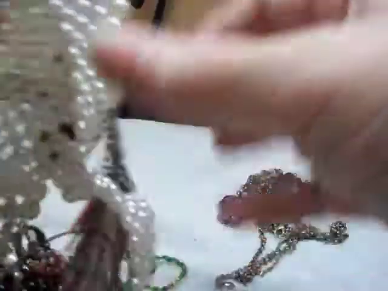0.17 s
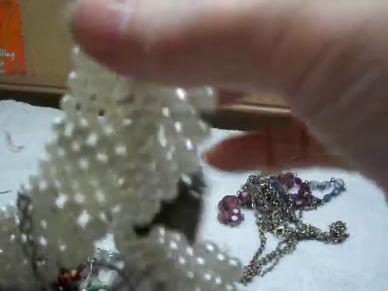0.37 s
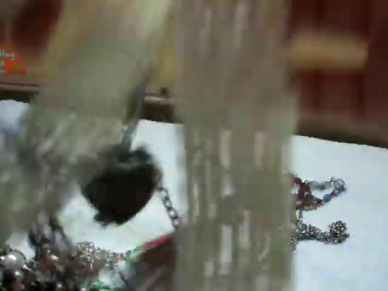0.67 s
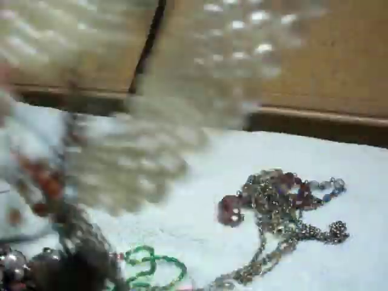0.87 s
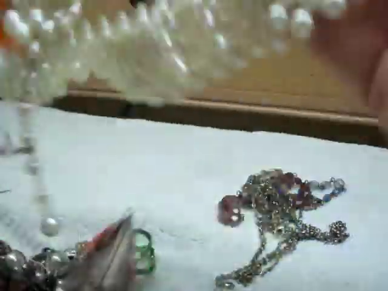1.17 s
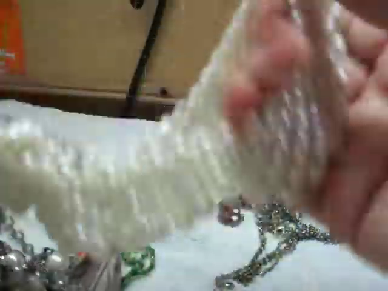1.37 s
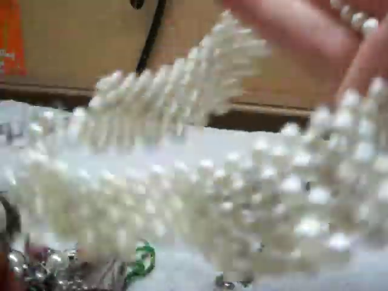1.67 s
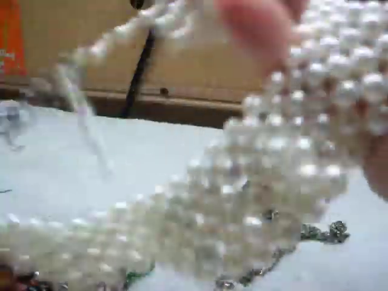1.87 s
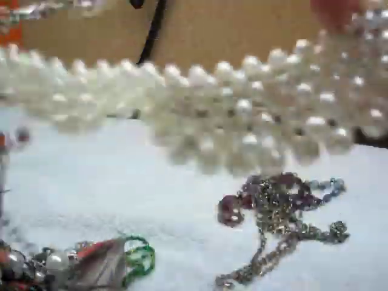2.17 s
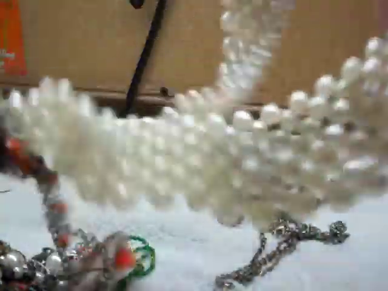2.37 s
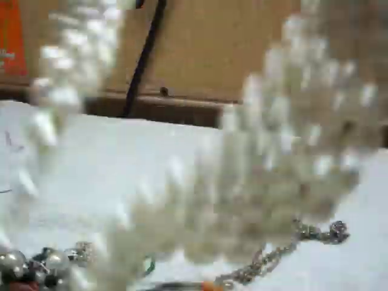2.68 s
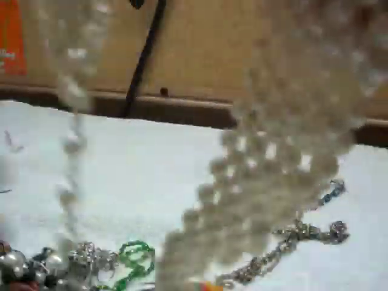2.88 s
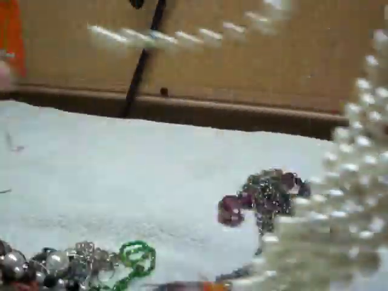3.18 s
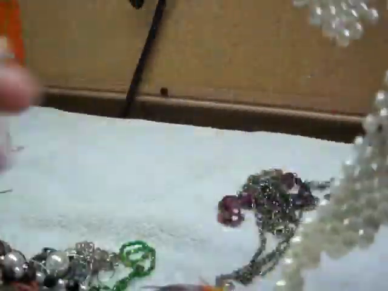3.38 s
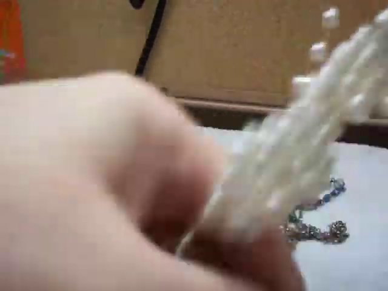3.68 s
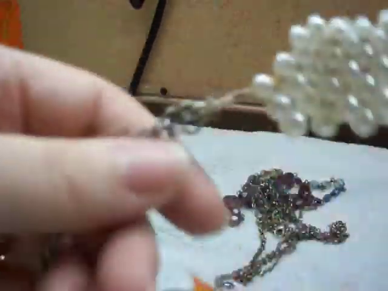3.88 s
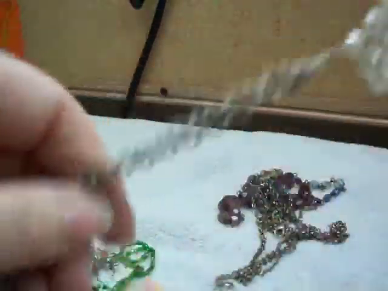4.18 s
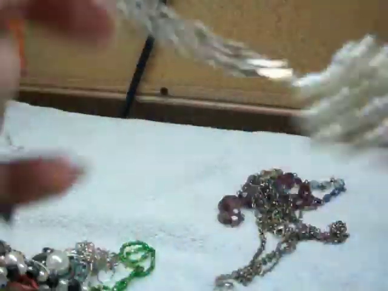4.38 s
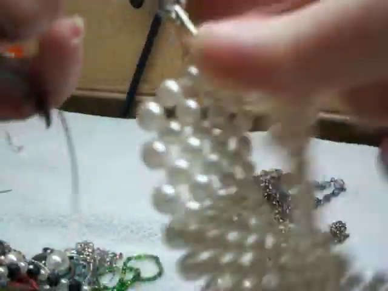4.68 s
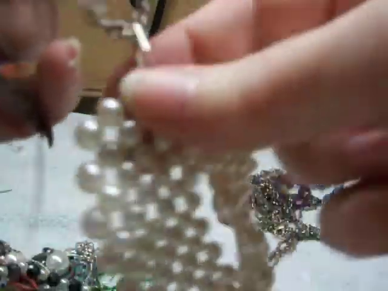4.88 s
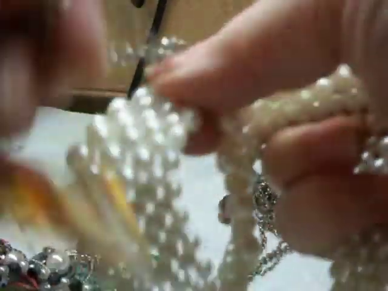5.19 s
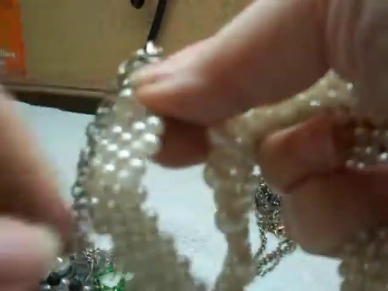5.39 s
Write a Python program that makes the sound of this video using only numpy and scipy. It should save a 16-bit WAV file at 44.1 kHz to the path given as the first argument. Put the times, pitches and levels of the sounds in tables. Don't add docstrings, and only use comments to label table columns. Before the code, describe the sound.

A low motor hum, building rumble, faint fan whir and steady hiss run throughout a small indoor space, heard by a small camera microphone a hand's width away, with little treble. At first a few plastic beads click, with a firmer tick at 0.24 s and a soft table thump at 0.28 s. From 0.65 to 0.95 s the collar is shaken into a dense, dry rattle. A tiny bell tinkles and rolls from about 0.4 s, clearest between 1.0 and 2.6 s, among swinging beads. At 2.73 s the collar drops, its clasp cracking sharply on the table, followed by scattered beads and a short chain slide. From 3.1 to 3.24 s loud, hollow knocks hammer the casing, with the hardest, clipped blow at 3.36 s and fading scrapes after. Then sparse clicks, small clasp and chain sounds around 4.5 to 4.7 s, near quiet, and a last landing at 5.43 s.

```python
import sys
import numpy as np
from scipy import signal
from scipy.fft import rfft, irfft, next_fast_len
from scipy.io import wavfile

SR = 44100
rng = np.random.default_rng(int(sys.argv[2]) if len(sys.argv) > 2 else 0)


def persist_wave(psi):
    counts = np.round(np.clip(psi, -1, 1) * 32767).astype(np.int16)
    wavfile.write(sys.argv[1], SR, np.atleast_2d(counts).T)


def volts_from_db(level):
    exponent = np.asarray(level, float) / 20
    return 10 ** exponent


N = 243873


def unit(x):
    return x / np.sqrt(np.mean(x ** 2) + 1e-20)


def along(points, hz):
    f, value = np.transpose(points)
    return np.interp(np.log(hz + 1), np.log(f + 1), value)


def curve(points):
    s, db = np.transpose(points)
    return np.interp(np.arange(N) / SR, s, db, left=-120, right=-120)


def filtered(x, response):
    size = next_fast_len(N + 8192)
    return irfft(rfft(x, size) * response(np.fft.rfftfreq(size, 1 / SR)), size)[:N]


def noise(response):
    return unit(filtered(rng.standard_normal(N), response))


def tone(hz, wander_hz, rate_hz):
    drift = noise(lambda f: 1 / (1 + (f / rate_hz) ** 2))
    return np.sqrt(2) * np.cos(2 * np.pi * np.cumsum(hz + wander_hz * drift) / SR)


def pings(s, db, hz, t60, attack, size):
    t = np.arange(size) / SR
    s, db, hz, t60 = (np.asarray(v, float)[:, None] for v in np.broadcast_arrays(s, db, hz, t60))
    decay = volts_from_db(db - 60 * t / np.maximum(t60, 1e-3))
    wave = decay * (1 - np.exp(-t / attack)) * np.sin(2 * np.pi * hz * t)
    at = np.round(s * SR).astype(int) + np.arange(size)
    return np.bincount(at.ravel(), wave.ravel(), N + size)[:N]


def strokes(s, length, db, rise, fall):
    t = np.arange(0, N + 64, 64) / SR
    s, end, db = (np.asarray(v, float)[:, None] for v in np.broadcast_arrays(s, s + length, db))
    power = volts_from_db(db - rise * np.maximum(s - t, 0) - fall * np.maximum(t - end, 0)) ** 2
    return np.interp(np.arange(N) / SR, t, np.sqrt(power.sum(0)))


# f/Hz, level/dB per Hz
HISS = [(88, -48), (150, -6.5), (350, -9.5), (453, -12.5), (586, -9), (966, -14), (1120, -13.5),
        (3400, -19), (3890, -18.5), (5600, -24.5), (7280, -51.5), (12300, -120)]


def hiss():
    return volts_from_db(-55.5) * noise(lambda f: volts_from_db(along(HISS, f)))


# f/Hz, level/dB per Hz
RUMBLE = [(10, -5.5), (24, 2), (50, -4.5), (61, -10.5), (85, -18), (116, -14), (132, -23.5), (150, -38.5),
          (200, -29.5), (440, -120)]
# t/s, level/dB
SWELL = [
    (0.0, -39.5),
    (1.09, -39.5),
    (2.5, -39),
    (3.3, -40.5),
    (3.86, -39.5),
    (4.4, -37.5),
    (5.53, -41),
]


def rumble():
    spectrum = noise(lambda f: volts_from_db(along(RUMBLE, f)) / (1 + (17 / (f + 1)) ** 4))
    return volts_from_db(curve(SWELL) - 2.5) * spectrum


# t/s, level/dB
HUM = [(0.0, -41.5), (0.11, -39), (0.21, -45.5), (0.92, -39), (1.12, -55.5), (1.52, -38), (1.62, -45.5),
       (1.99, -40), (2.66, -38.5), (2.8, -53), (2.93, -41), (3.22, -56), (3.37, -38), (3.53, -47.5),
       (5.19, -41), (5.53, -46)]


def motor():
    return volts_from_db(curve(HUM)) * tone(44, wander_hz=1.483, rate_hz=2.86)


# f/Hz, wander/Hz, level/dB
FAN = [(593, 8, -68.5), (636, 5, -67.5), (4920, 2.5, -70.5), (4960, 60, -76), (5450, 4, -80),
       (5760, 5, -78), (6060, 2.5, -78)]


def fan():
    return sum(volts_from_db(db) * tone(hz, wander_hz, rate_hz=52) for hz, wander_hz, db in FAN)


def walls(x):
    t = np.arange(SR // 8) / SR
    tail = rng.standard_normal(len(t)) * volts_from_db(-60 * t / 0.05) * (t > .002)
    return signal.fftconvolve(x, tail / np.linalg.norm(tail))[:N]


# t/s, level/dB, f/Hz, t60/s
THUMPS = [(.2795, -26.5, 476, 0.014), (.95, -29.5, 201, 0.0096), (2.565, -26.5, 606, 0.0041),
          (2.728, -27, 110, 0.2), (2.73, -31, 274, 0.039), (2.801, -35, 122.6, 0.23),
          (4.05, -40, 303, 0.012), (4.17, -36, 662, 0.019), (4.659, -31, 600, 0.013),
          (4.6628, -36, 325, 0.043), (4.674, -37, 210, 0.044), (5.4285, -34.5, 765, 0.021),
          (5.4352, -31, 750, 0.022)]


def table():
    return pings(*np.transpose(THUMPS), attack=0.000072, size=9000)


# t/s, peak level/dB, low body level/dB, top shell level/dB
KNOCKS = [(3.1035, -12, -5.5, -12), (3.1085, -9, -14, -4), (3.117, -12.5, -1, -17), (3.122, -7, -10, -4.5),
          (3.1285, -15, -10, -4), (3.135, -19, -6, -4), (3.145, -21, -2, -17), (3.154, -22.5, -3, -9),
          (3.157, -23.5, 0, -7), (3.1802, -15.5, -7, -2), (3.1848, -11, -5, -15), (3.1903, -16.5, 0, -3.5),
          (3.2002, -14.5, 0, 0), (3.2057, -22, 4, -30), (3.2187, -22.5, -8, 2), (3.2168, -15.5, -4.5, -17),
          (3.2328, -18, -8, -5), (3.2367, -17.5, -7, -34), (3.3562, 3, -4.5, -0.5),
          (3.3682, -17.5, -10, 1.5), (3.3725, -24.5, -9, -7), (3.381, -27, -8.5, -4),
          (3.389, -36.5, -3.5, -14), (3.42, -32.5, -6, -34), (3.463, -40.5, 1.5, -14.5),
          (3.479, -35, 0, -20), (3.4905, -33, -1, -23), (3.5031, -35.5, 7, -16), (3.513, -43, 6, -16),
          (3.527, -40, 7, -21), (3.545, -37, 6, -13)]
# f/Hz, t60/s, level/dB
CASING = [(420, 0.25, -18), (775, 0.04, -5), (868, 0.045, 1.5), (1015, 0.063, -1), (1440, 0.047, -9.5),
          (1622, 0.045, -11), (1740, 0.04, -6), (2030, 0.093, -15), (2270, 0.027, 2.5), (2620, 0.074, -9.5),
          (3230, 0.042, -3.5), (3790, 0.023, -14.5), (4960, 0.026, 3.5), (5930, 0.03, -8)]
# t/s, level/dB, f/Hz, t60/s
BLOW = [
    (3.0961, 2, 4960, 0.0083),
    (3.0971, 1.5, 2230, 0.011),
    (3.0968, -1, 3180, 0.0095),
    (3.0962, -14, 5930, .008),
    (3.0979, -10, 1500, .012),
    (3.0976, -13, 923, 0.013),
    (3.0980, -16.5, 570, 0.02),
    (3.0980, -21.5, 420, 0.045),
]


def knocks():
    out, scrape, t = np.zeros(N), np.zeros(N), np.arange(1500) / SR
    hz, t60, shape_db = np.transpose(CASING)
    for s, db, low_db, top_db in KNOCKS:
        luck = rng.standard_normal((3, len(hz)))
        region_db = np.where(hz < 1200, low_db, np.where(hz > 4000, top_db, 0))
        level = db + shape_db + region_db - 8.5 + 2.0 * luck[1]
        start = s + 0.00042 * np.abs(luck[0])
        out += pings(start, level, hz * (1 + 0.013 * luck[2]), 0.44 * t60, attack=0.00063, size=2500)
        burst = volts_from_db(db - 19.5 - 60 * t / 0.025) * (1 - np.exp(-t / 0.0014))
        scrape[round(s * SR):][:len(t)] += burst * rng.standard_normal(len(t))

    def body(f):
        total = volts_from_db(1.5)
        for k, (centre, _, gain_db) in enumerate(CASING):
            width = 1j * f * 320
            total = total + (-1) ** k * volts_from_db(gain_db) * width / (centre * centre - f * f + width)
        return total

    out += filtered(scrape, body)
    out = .62 * np.tanh(out / .62)
    return out + pings(*np.transpose(BLOW), attack=0.00041, size=1500)


# t/s, peak level/dB, low mode level/dB
BELL_HITS = [(0.3943, -47, -16), (0.4161, -41.5, -15), (0.4456, -50, -13), (0.4707, -51, -12),
             (0.4935, -41.5, -14), (0.5287, -46, -23), (0.5621, -53, -8), (0.8046, -38, -10),
             (0.8258, -38, -11), (0.8557, -35, -9), (0.8775, -40, 2), (0.91, -34.5, -5), (0.9722, -43, -23),
             (1.0251, -29.5, -9), (1.0408, -28.5, -12), (1.1037, -48, -17), (1.2386, -39, -16),
             (1.3972, -46, -18), (1.4367, -25, -20), (1.4523, -32.5, -17), (1.4645, -32.5, -10),
             (1.501, -32, -18), (1.5166, -45, -25), (1.7528, -36, -20), (1.7802, -35, -26),
             (1.7929, -32.5, -23), (1.8092, -28.5, -11), (1.8431, -53, -5), (1.8596, -53, 1),
             (1.8897, -54, -11), (1.926, -31.5, -14), (1.9632, -31, -20), (1.9801, -32, -15),
             (2.0039, -26.5, -22), (2.0285, -36, -32), (2.0444, -44.5, -24), (2.0617, -39, -12),
             (2.1426, -47.5, -2), (2.1827, -38, -2.5), (2.2001, -40, -14), (2.2158, -50, -4),
             (2.2331, -40, -11), (2.2472, -40, -8), (2.2668, -33.5, -21), (2.2829, -29, -30),
             (2.3191, -39, -15), (2.3427, -32.5, -16), (2.3742, -30.5, -17), (2.3925, -39, -5),
             (2.4123, -36.5, -7), (2.4315, -42, -8), (2.4619, -35, -16), (2.477, -41, -5),
             (2.4989, -43, -2), (2.5165, -49.5, 10.5), (2.5395, -36, -8), (2.5532, -34, -5),
             (2.5762, -31, -23), (2.6073, -42, -19.5), (2.6243, -41, -24),
             (.993, -41, -12),
    (1.0135, -29, -9),
    (1.214, -44, -11),
    (1.293, -51, -10),
    (1.769, -46, -19),
    (1.802, -34, -19),
    (1.915, -37, -16),
    (2.0005, -28.5, -16),
    (2.078, -48, -22),
    (2.358, -33, -19),
]
# f/Hz, t60/s
BELL = [(3440, 0.047), (2390, 0.064)]


def bell():
    s, db, low_db = np.transpose(BELL_HITS)
    (hz, t60), (low_hz, low_t60) = BELL
    drift = 1 + 0.0082 * rng.standard_normal((len(s), 2))
    strikes = pings(s, db + 1, hz * drift[:, 0], t60, attack=0.0005, size=4000)
    strikes += pings(s, db + low_db + 3.5, low_hz * drift[:, 1] ** 2, low_t60, attack=0.00036, size=3000)

    skips = rng.standard_normal(N) * (rng.random(N) < 900 / SR)
    high = unit(filtered(skips, lambda f: 1 / (hz * hz - f * f + 1j * f * 30)))
    high = unit(0.8 * high + tone(hz, wander_hz=38, rate_hz=70))
    low = unit(filtered(skips, lambda f: f / (low_hz * low_hz - f * f + 1j * f * 170)))

    def roll(level):
        return strokes(s, 0.013, level, rise=2500, fall=520)

    return strikes + roll(db - 15) * high + roll(db + low_db - 17.5) * low


# t/s, level/dB, f/Hz, t60/s
CLASP = [(.09, -38.5, 3320, 0.03), (2.7000, -36.5, 3480, 0.24), (2.7285, -11, 4560, 0.013),
         (2.7296, 0.5, 2770, 0.009), (2.7349, -8.5, 2020, 0.008), (2.7345, -14, 4600, 0.009),
         (2.7522, -14, 2000, .012), (2.7524, -18, 3300, .01), (2.7344, 6.5, 3150, 0.0059),
         (2.7560, -22, 3300, 0.017), (2.792, -27, 3860, 0.03), (2.791, -37, 1410, 0.059),
         (2.792, -39.5, 2676, 0.076), (2.7930, -41.5, 4960, 0.058), (4.435, -44.5, 5440, 0.052),
         (4.5760, -31, 3440, 0.032), (4.582, -28, 3440, 0.028), (4.6, -43, 3540, 0.03)]


def clasp():
    return pings(*np.transpose(CLASP), attack=0.00085, size=3500)


def swarm(slips, centre_hz, spread, cycles, scatter_db, count):
    u = rng.random((count, 2))
    z = np.clip(rng.standard_normal((count, 2)), -2, 2)
    s = slips[(u[:, 0] * len(slips)).astype(int)] + .0011 * z[:, 0]
    s = np.clip(s, 0, N / SR)
    size_db = -scatter_db * np.log(1 - .97 * u[:, 1])
    hz = centre_hz * np.exp(spread * z[:, 1])
    t60 = cycles / centre_hz
    return unit(pings(s, size_db, hz, t60, attack=.0001, size=round(SR * t60)))


# start t/s, length/s, small beads level/dB, big beads level/dB
SHAKES = [(0, 0.66, -63.5, -56.5), (0.2, 0.025, -59.5, -62.5), (0.662, 0.03, -47, -44.5),
          (0.718, 0.018, -47, -46), (0.787, 0.135, -48.5, -41), (1.014, 0.017, -45.5, -59),
          (1.082, 0.2, -55.5, -52.5), (1.286, 0.62, -57.5, -55), (1.628, 0.037, -60, -52),
          (1.808, 0.015, -50.5, -61), (1.954, 0.03, -54, -54), (2.131, 0.082, -59, -53),
          (2.252, 0.39, -56.5, -56.5), (2.536, 0.031, -55.5, -45.5), (2.717, 0.15, -65, -47.5),
          (2.965, 0.1, -60, -54.5), (3.41, 0.24, -78, -59), (3.571, 0.024, -59, -52),
          (3.769, 0.23, -63, -60), (4.158, 0.048, -59, -50.5), (4.238, 0.44, -61.5, -55.5),
          (4.729, 0.039, -59, -49), (5.266, 0.074, -58, -53.5), (5.427, 0.05, -59, -49)]
# start t/s, length/s, level/dB
CHAIN = [
    (2.84, 0.022, -34.5),
    (4.505, 0.086, -52),
    (4.64, 0.023, -48),
    (4.704, 0.035, -40.5),
]


def rattle():
    slips = rng.random(size=1700) * N / SR
    small = swarm(slips, 4290, 0.27, cycles=8.4, scatter_db=4, count=9000)
    big = swarm(slips, 2175, 0.27, cycles=15, scatter_db=4, count=7000)
    crisp = swarm(slips, 3200, 0.3, cycles=5.5, scatter_db=3.5, count=5000)
    links = swarm(slips, 3580, .028, cycles=45, scatter_db=2, count=5000)
    s, length, small_db, big_db = np.transpose(SHAKES)

    def shake(level):
        return strokes(s, length, level, rise=696.5, fall=423)

    out = volts_from_db(-8.5) * strokes(*np.transpose(CHAIN), rise=300, fall=399) * links
    out += volts_from_db(2.0) * shake(small_db) * small
    out += volts_from_db(-6) * shake((small_db + big_db) / 2) * crisp
    return out + volts_from_db(-6.0) * shake(big_db) * big


# t/s, peak level/dB, f/Hz
CROWD_TICKS = [(0.6587, -40, 2020), (0.6607, -42, 4570), (0.6765, -37, 2150), (0.683, -38.5, 4010),
               (0.685, -35, 2000), (0.6977, -45, 3880), (0.7241, -44, 4130), (0.728, -39, 1790),
               (0.7347, -45, 4110), (0.7903, -33, 1870), (0.802, -40, 3770), (0.8046, -30, 2150),
               (0.807, -47, 4350), (0.827, -42, 2110), (0.836, -32, 2110), (0.8434, -38, 3810),
               (0.8452, -28, 1810), (0.85, -35, 2430), (0.8576, -41.5, 4030), (0.8627, -34.5, 4950),
               (0.8684, -34, 2110), (0.8738, -29, 2330), (0.8752, -47, 4760), (0.8799, -27.5, 2220),
               (0.8798, -43, 4970), (0.897, -35, 2500), (0.8981, -41, 5280), (0.906, -42, 3700),
               (0.912, -35, 5150), (0.9171, -35, 2500), (0.9181, -36, 3810), (0.9205, -35, 2500),
               (0.9295, -44.5, 5040),
               (1.7914, -45, 3700), (1.8117, -36, 5200), (1.816, -38, 2730), (1.823, -37, 2440),
               (1.8242, -38, 5170), (1.828, -40.5, 2640), (1.8358, -50, 3830), (1.8369, -50, 2400),
               (2.1808, -47, 4350), (2.233, -42, 2500), (2.2822, -49, 3670), (2.3422, -48, 3700),
               (2.347, -46, 3730), (2.347, -41.5, 2610), (2.3835, -42, 2390), (2.4052, -44, 3700),
               (2.4097, -42, 2250), (2.425, -46, 3920), (2.4256, -35, 2270), (2.43, -40, 2330),
               (2.44, -45, 2480), (2.448, -34, 2600), (2.4463, -48, 4370), (2.4725, -41, 2410),
               (2.4792, -43, 3700), (4.2706, -44, 3100), (2.4992, -44, 2240), (2.5288, -43, 5000),
               (2.542, -38, 2370), (2.5437, -45, 5060), (2.5654, -42, 3720), (2.565, -34, 2220),
               (2.5724, -44, 3660), (2.575, -41, 2360), (3.939, -46, 4300), (2.6071, -44, 3700),
               (4.5274, -50, 3920), (4.5549, -49, 3830), (4.5595, -49, 2300), (4.5599, -43.5, 4500),
               (4.5642, -38.5, 4180), (4.5804, -40, 3670), (4.5966, -46, 3700), (4.6376, -46, 1790),
               (4.663, -47, 1670), (4.7079, -43, 2990), (4.7624, -47, 3790), (4.7649, -46, 2130)]


def ticks():
    s, db, hz = np.transpose(CROWD_TICKS)
    snap = pings(s, db + 3.5, 3400, .0013, attack=.0001, size=200)
    return pings(s, db + 7, hz, 0.0074, attack=0.00016, size=700) + snap


# t/s, peak level/dB, f/Hz
SMALL_BEADS = [(0.1373, -44.5, 5100), (0.5272, -42.5, 4340), (0.55, -44, 4340), (0.6459, -33, 4600),
               (0.6683, -37, 4460), (0.7016, -30, 3940), (0.7212, -37.5, 4150), (0.7668, -32.5, 3930),
               (0.842, -44, 4260), (0.9103, -38, 3850), (1.0282, -40, 3840), (1.105, -35.5, 3980),
               (1.148, -44, 4070), (1.21, -43, 5160), (1.263, -43, 3850), (1.4353, -38.5, 4520),
               (1.7536, -41, 5120), (1.812, -39.5, 5330), (1.8213, -38, 5040), (1.979, -41.5, 4140),
               (2.5423, -47, 5040), (2.5553, -32, 5040), (2.6397, -51, 4950)]
# t/s, peak level/dB, f/Hz
BIG_BEADS = [(0.2364, -25, 2580), (0.395, -44, 2670), (0.4368, -39.5, 1950), (0.524, -39, 2130),
             (0.5634, -39.5, 2650), (0.6447, -35, 2140), (0.6593, -37.5, 2050), (0.6693, -32, 1950),
             (0.7026, -27.5, 3100), (0.721, -39, 2190), (0.7586, -30, 2030), (0.7846, -20, 2730),
             (0.821, -28.5, 1900), (0.8545, -25.5, 2400), (0.909, -28, 2480), (1.181, -44, 1750),
             (1.2107, -46, 2250), (1.0221, -42, 2380), (1.033, -28.5, 2370), (1.1052, -39.5, 1770),
             (1.4362, -29.5, 2810), (1.641, -42, 2420), (1.7533, -30, 3300), (1.8105, -38.5, 3220),
             (1.817, -35, 3180), (1.8225, -33, 3450), (2.1854, -36, 2330), (2.283, -42, 2640),
             (2.3754, -37, 2650), (2.4, -34, 2650), (2.4247, -50, 2270), (2.5178, -37, 2300),
             (2.553, -32.5, 2420), (2.694, -33.5, 2340), (2.715, -36.5, 2400)]
# t/s, peak level/dB, f/Hz
LATER_BEADS = [(2.7278, -9.5, 2590), (2.7293, -14.5, 2770), (2.7355, -27, 2600), (2.7560, -22, 3260),
               (2.7744, -35, 3280), (2.8316, -28, 3230), (2.8445, -31, 3100), (2.8498, -33, 3650),
               (2.8655, -45, 3780), (2.943, -44, 3730), (2.9991, -41, 2090), (3.014, -41, 3600),
               (3.0296, -40, 3570), (3.063, -41.5, 2170), (5.4291, -24.5, 2100), (5.4388, -35, 1920),
               (5.447, -39, 1300), (5.479, -39, 1800), (5.4352, -30, 1900), (5.458, -37, 1970),
               (5.462, -42, 1760), (5.48, -42.5, 5020), (5.4296, -35, 3100), (5.5133, -35.5, 1820),
               (3.5718, -49, 2030), (3.5745, -34.5, 1920), (3.6124, -36.5, 1130), (3.827, -44.5, 2080),
              (3.828, -36.5, 3860), (3.9388, -39, 2320), (4.166, -40, 1850), (4.2703, -34, 4190),
              (4.292, -46, 2190), (4.312, -45, 2550), (4.342, -42.5, 2290), (4.3686, -40, 3780),
              (4.405, -42, 2300), (4.435, -43, 5430), (4.455, -50, 1910), (4.575, -30.5, 3700),
              (4.6575, -38, 1760), (4.6956, -38, 3400), (4.7444, -41, 2020), (4.7549, -38.5, 4520),
              (4.902, -45.5, 2130), (4.9224, -46, 1950), (5.2607, -46.5, 1810), (5.282, -47, 2060),
              (5.303, -42.5, 2020), (5.4127, -44, 2030), (5.4175, -45, 1920), (5.426, -37, 1500),
              (3.586, -45, 4750), (3.557, -48, 3170)]


def beads():
    s, db, hz = np.transpose(SMALL_BEADS + BIG_BEADS + LATER_BEADS)
    luck = rng.standard_normal((len(s), 3))
    tick = pings(s, db + 8.0, hz, 0.0073, attack=0.0003, size=900)
    snap = pings(s, db - 2, 2600 * np.exp(.1 * luck[:, 0]), .0015, attack=.0001, size=200)
    snap += pings(s + .0002, db - 4, 4600 * np.exp(.08 * luck[:, 1]), .0015, attack=.0001, size=200)
    snap += pings(s, db - 14, 1700, .002, attack=.0001, size=200)
    delay = 0.0039 + .001 * luck[:, 2]
    echo = pings(s + delay, db - 12, hz * 1.2, 0.013, attack=0.00023, size=1500)
    return tick + volts_from_db(7) * snap + echo


def scene():
    room = hiss() + rumble() + motor() + fan()
    blows = filtered(knocks(), lambda f: (1j * f / (300 + 1j * f)) ** 2)
    collar = bell() + clasp() + rattle() + ticks() + beads()
    collar = filtered(collar, lambda f: (1j * f / (700 + 1j * f)) ** 2)
    echoes = volts_from_db(-10.0) * walls(blows) + volts_from_db(-11.0) * walls(collar)
    return (room + table() + blows + collar + echoes)[None]


def band_limit(x):
    return signal.sosfilt(signal.butter(12, 16550, fs=SR, output="sos"), x)


# f/Hz, level/dB
EDGE = [(5300, -1), (5700, -7.5), (6100, -22), (6600, -45), (7200, -62), (8500, -110)]


def record(dry):
    already = dry[0, 0] + (dry[0, -1] - dry[0, 0]) * np.arange(N) / N
    x = filtered(dry[0] - already, lambda f: volts_from_db(along(EDGE, f)))
    clipped = np.clip(x, -.7, .7)
    x = filtered(clipped, lambda f: np.clip((16600 - f) / 300, 0, 1))
    mix = volts_from_db(along(EDGE, 1)) * already + x
    return band_limit(mix[None])


dry = scene()
out = record(dry)
persist_wave(out)
```